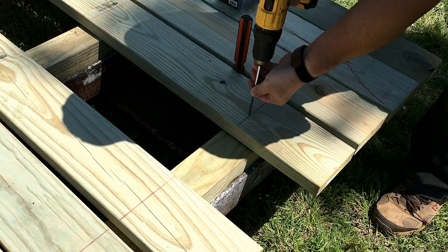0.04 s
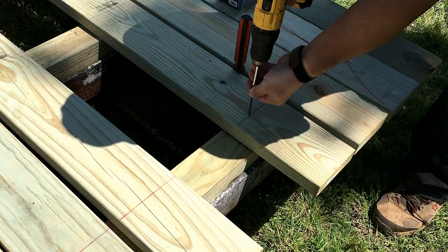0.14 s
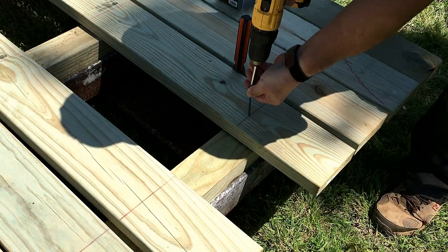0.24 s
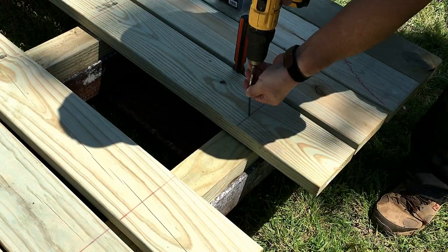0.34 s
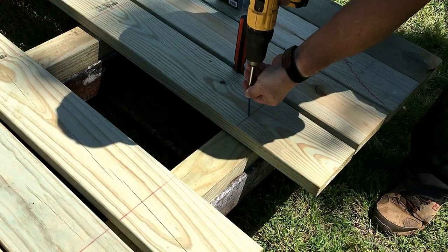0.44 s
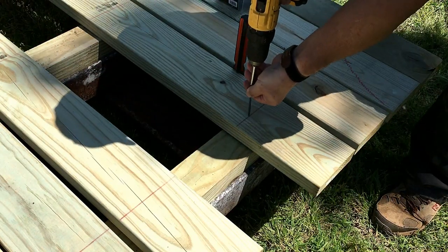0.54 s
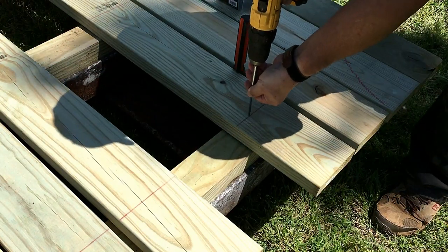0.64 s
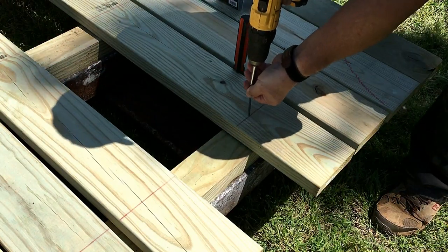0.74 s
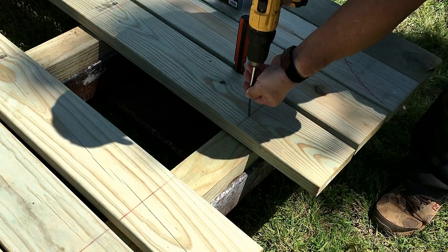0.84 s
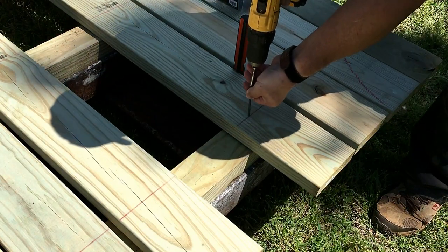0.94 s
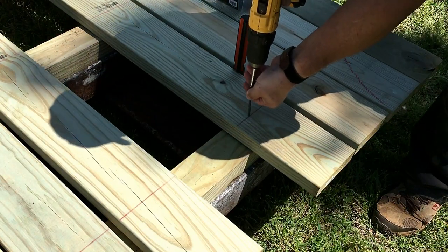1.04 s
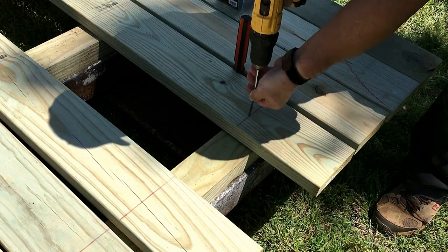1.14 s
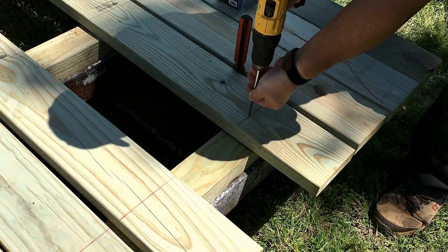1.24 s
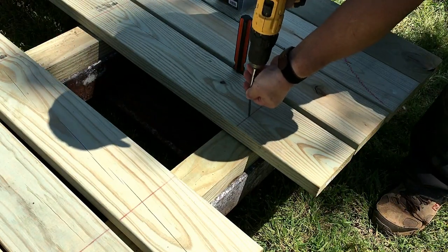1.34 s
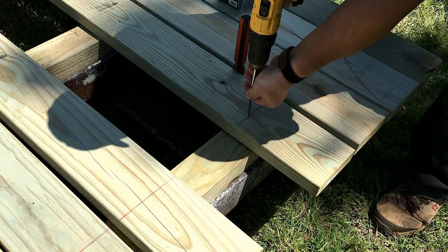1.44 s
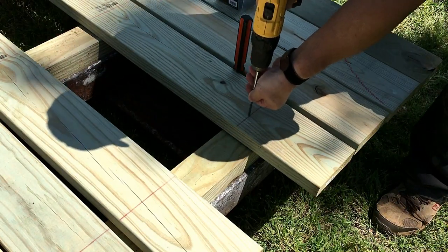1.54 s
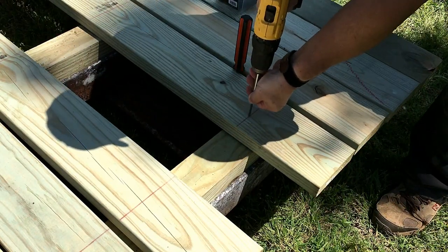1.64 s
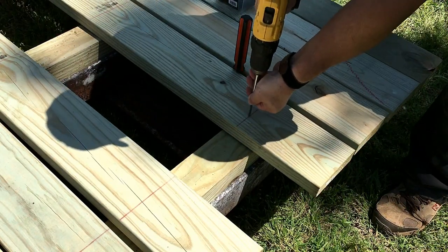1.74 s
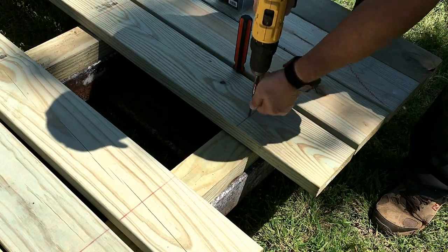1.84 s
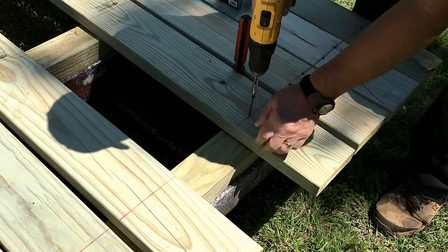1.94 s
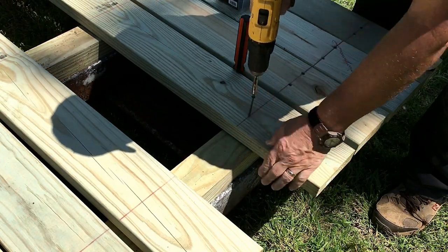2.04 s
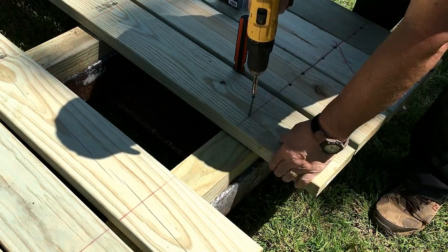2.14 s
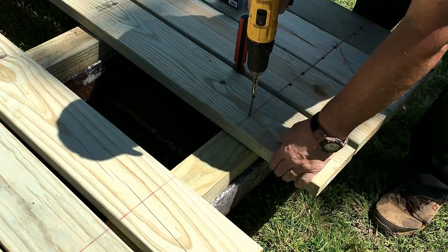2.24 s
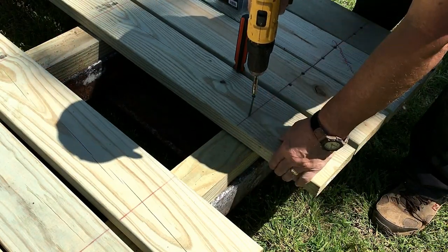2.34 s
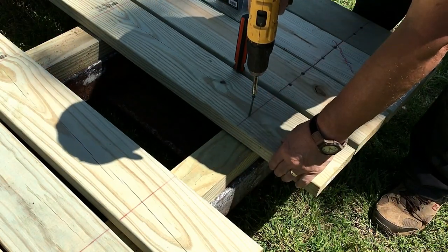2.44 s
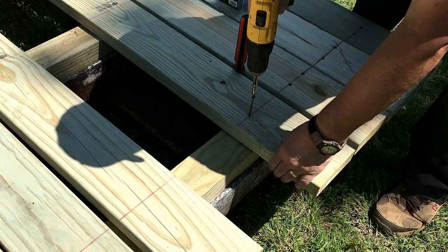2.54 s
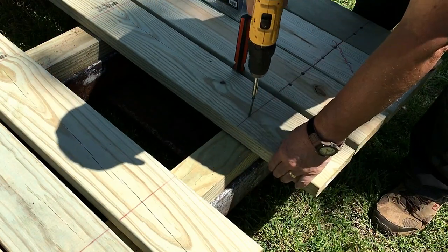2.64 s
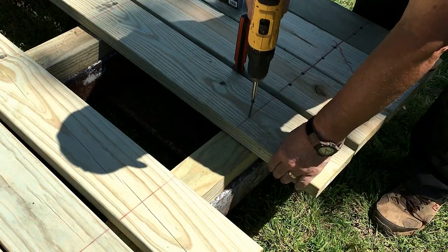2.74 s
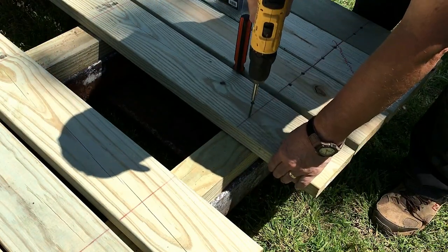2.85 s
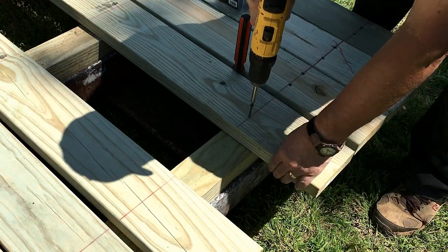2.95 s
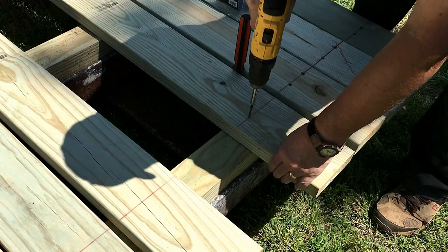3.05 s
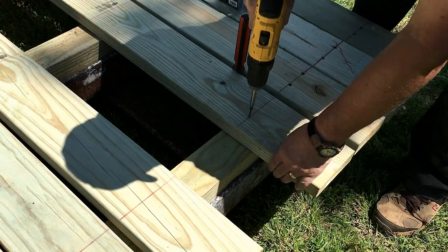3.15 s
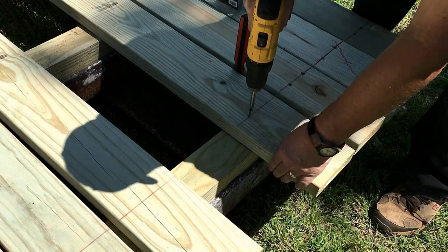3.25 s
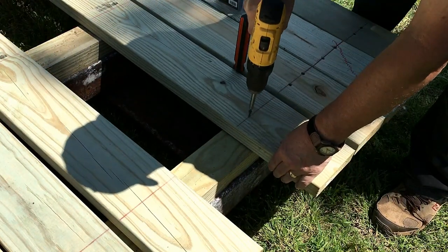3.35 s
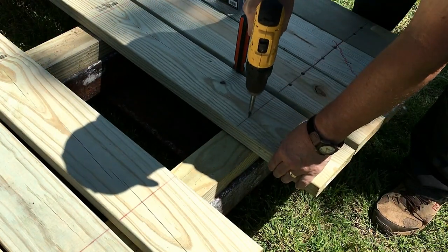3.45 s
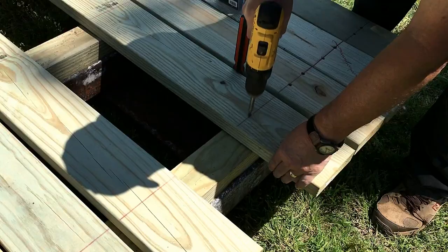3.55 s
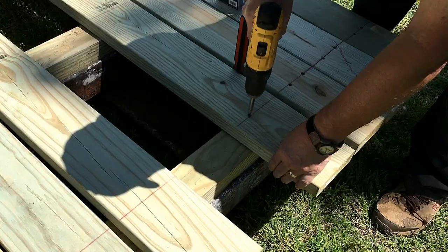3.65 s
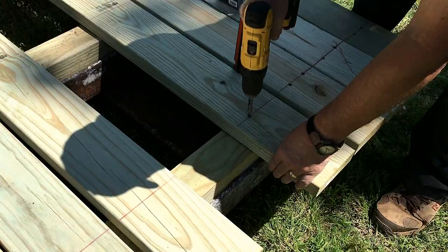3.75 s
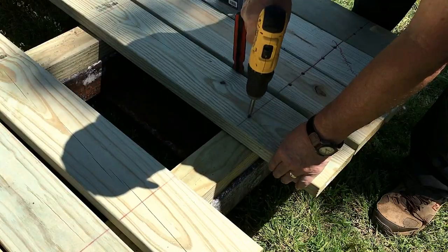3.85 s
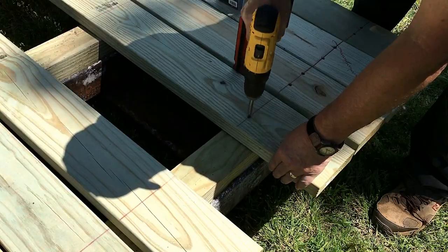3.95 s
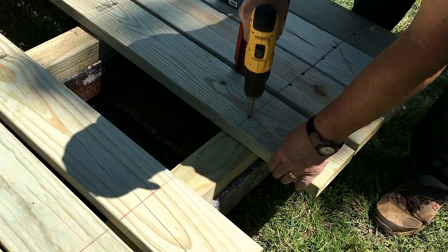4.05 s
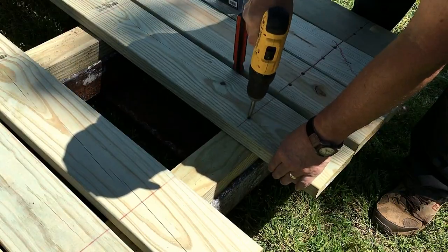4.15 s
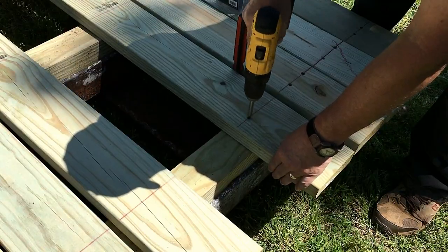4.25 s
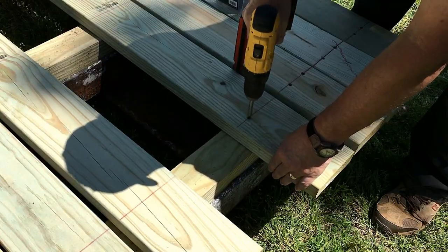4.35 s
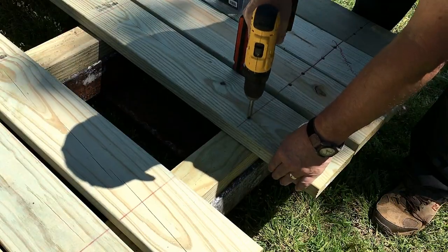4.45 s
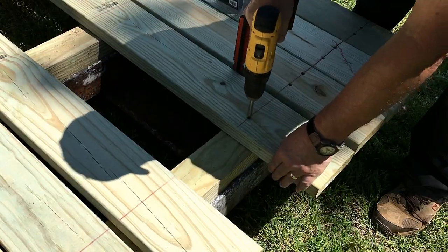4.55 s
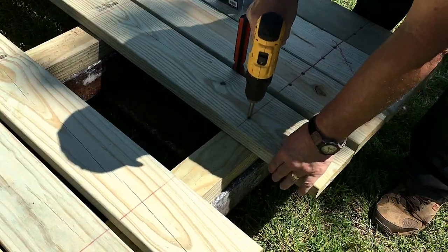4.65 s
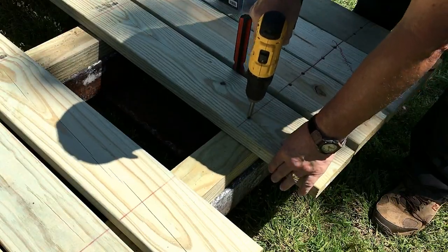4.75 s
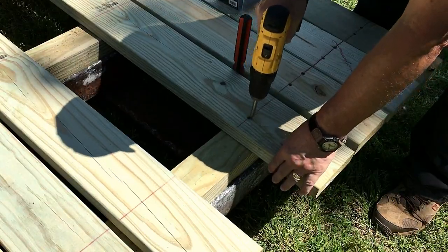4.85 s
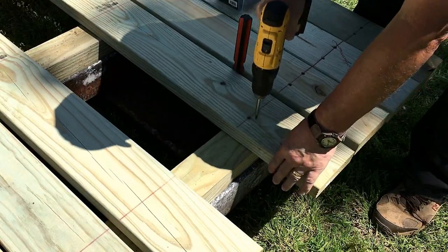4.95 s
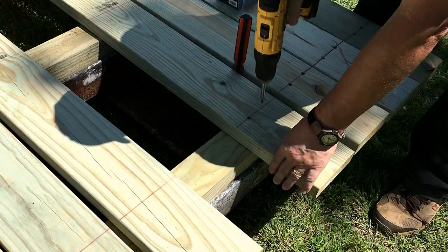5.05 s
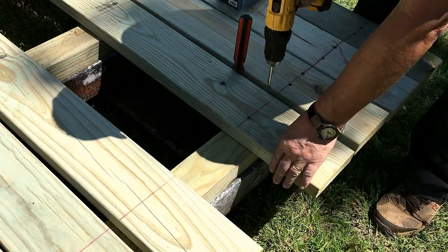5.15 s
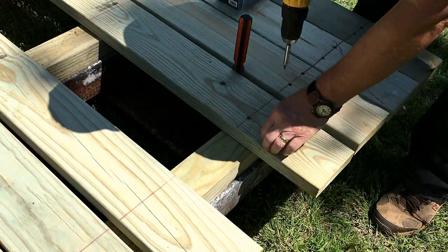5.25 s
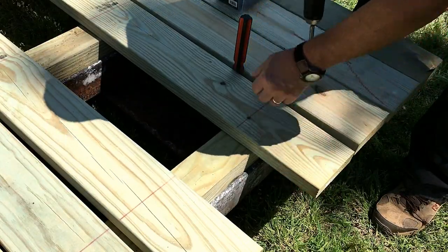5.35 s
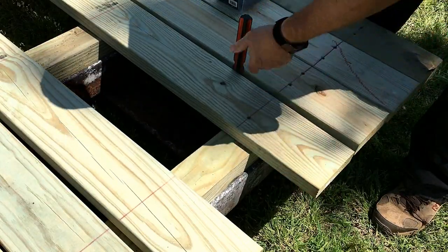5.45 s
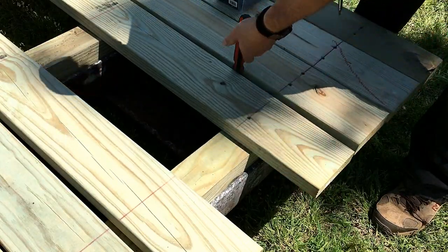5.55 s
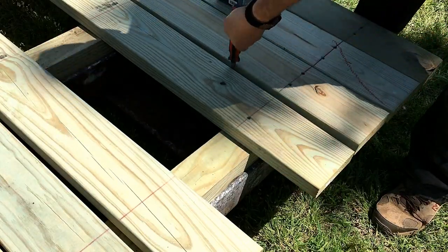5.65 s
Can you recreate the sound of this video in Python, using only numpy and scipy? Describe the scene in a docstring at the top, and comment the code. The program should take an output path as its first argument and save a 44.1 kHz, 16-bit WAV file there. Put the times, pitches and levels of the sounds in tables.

```python
"""A faint bird call over a low outdoor rumble, then a click: a cordless drill drives a long screw into a deck board.
We hear a slow run, a full-trigger run and two short bursts. One turning shaft drives the gears and the screw:
the gears whine and rattle, the bit grinds, and the screw shakes the board. The speed controller whistles
at part trigger. Between and after the runs the tool and a hand knock on the wood, with small dry clicks.
Small birds are gliding tones; the outdoor background is filtered noise."""
import sys
import numpy as np
from scipy import signal
from scipy.fft import rfft, irfft
from scipy.io import wavfile
from scipy.ndimage import uniform_filter1d

SR = 44100
rng = np.random.default_rng(int(sys.argv[2]) if len(sys.argv) > 2 else 0)


def transcribe(signal):
    """Save signal, clipped to [-1, 1], as a 16-bit WAV file at the path in sys.argv[1]."""
    frames = np.atleast_2d(signal).T
    limited = np.clip(frames, -1, 1)
    pcm = np.round(limited * 32767).astype(np.int16)
    wavfile.write(sys.argv[1], SR, pcm)


N = 251323
TIME = np.arange(N) / SR  # seconds
HZ = np.fft.rfftfreq(8192, 1 / SR)  # frequencies at which filters are drawn

# pulls of the trigger; levels are starting points that speed, strain and time then change:
# start_s, release_s, spin_up_s, gear_rattle_db, bit_grinding_db, tooth_whine_db
TRIGGER_PULLS = [(0.19, 1.890, .028, -40, -46, -39), (2.674, 3.650, 0.051, -34.5, -37.6, -34.6),
                 (3.815, 3.924, .028, -35.5, -31, -27.5), (4.099, 4.203, .032, -34.5, -30.2, -25)]
# how hard the drill works: time_s, load (bite of the thread, 0-1), strain (labouring motor, 0-1)
EFFORT_CURVE = [(1.52, 0, 0), (1.63, .2, 1), (1.95, .5, 1), (2.66, 1, .1), (3.55, 1, .1), (3.82, 1, 1)]
# how hard the thread shakes the board, before the effect of speed: time_s, level_db
THREAD_GRIP = [(.22, -54), (.47, -44), (.86, -40), (1.15, -38.5), (1.52, -40.5), (1.58, -35.5), (1.86, -33),
               (1.93, -44), (2.70, -39), (2.79, -28), (2.96, -30.3), (3.04, -27.5), (3.21, -30),
               (3.68, -32.3), (3.83, -35.5), (3.95, -31.5), (4.17, -29), (4.25, -31.5)]
# loudness grows as a power of speed, once the shaft passes a knee (turns per s)
RATTLE_POWER, RATTLE_KNEE = 0.97, 67
GRIND_POWER, GRIND_KNEE = 0.28, 53
BOARD_POWER, BOARD_KNEE = 0.31, 15
GRIND_DB_PER_S = 2.5  # the bit grinds harder as each run sinks the screw
RATTLE_STRAIN_DB = 2.4  # change at full strain


def drill(unsteady=0.00056, unsteady_loaded=0.00199):
    """One slightly unsteady shaft drives the gears and the screw; speed and effort set their levels."""
    effort_s, load_points, strain_points = np.transpose(EFFORT_CURVE)
    load = np.interp(TIME, effort_s, load_points)
    strain = np.interp(TIME, effort_s, strain_points)
    speed = motor_speed(load)
    # each moment takes its levels from the latest pull of the trigger
    pulls = np.array(TRIGGER_PULLS)
    latest = np.maximum(np.searchsorted(pulls[:, 0], TIME) - 1, 0)
    start, _, _, rattle_db, grind_db, whine_db = pulls[latest].T
    unsteadiness = (unsteady + unsteady_loaded * load) * drift(46.3)
    turns = np.cumsum(speed * (1 + unsteadiness)) / SR

    whine = tooth_whine(turns, speed, load, strain, whine_db)
    gears = gearbox(turns, speed, load, strain) * amp(rattle_db + RATTLE_STRAIN_DB * strain)
    gears = gears * with_speed(speed, RATTLE_POWER, RATTLE_KNEE)
    grind, board = screw(turns, load, strain)
    grind = grind * amp(grind_db + GRIND_DB_PER_S * (TIME - start))
    grind = grind * with_speed(speed, GRIND_POWER, GRIND_KNEE)
    board = board * amp(np.interp(TIME, *np.transpose(THREAD_GRIP)))
    board = board * with_speed(speed, BOARD_POWER, BOARD_KNEE)
    return whine + gears + grind + board


# the speed that trigger and wood allow the motor: time_s, speed_turns_per_s
ALLOWED_SPEED = [(.24, 146), (.35, 169.5), (.47, 188.8), (.55, 196.6), (.63, 201.7), (1.05, 215.7),
                 (1.2, 221.7), (1.4, 230.8), (1.48, 231.4), (1.55, 227.3), (1.62, 213.3), (1.8, 168.3),
                 (1.89, 152.5), (2.67, 330), (2.9, 329), (2.96, 316), (3.1, 300.8), (3.2, 296.6),
                 (3.29, 299.1), (3.43, 286), (3.5, 284.2), (3.65, 272.7), (3.82, 244), (4.1, 212)]
# turns per s, lost each second: the brake alone, and what a fully biting thread adds
BRAKE_SLOWING, THREAD_SLOWING = 1300, 2300
CRAWL_SPEED, USUAL_SPEED = 25, 200  # turns per s: silent at a crawl; the power of speed is 1 at usual


def motor_speed(load):
    """Each pull spins the shaft up toward the allowed speed; on release brake and thread slow it steadily."""
    allowed = np.interp(TIME, *np.transpose(ALLOWED_SPEED))
    speed = np.full(N, float(CRAWL_SPEED))
    for start, release, spin_up, *_ in TRIGGER_PULLS:
        driven = allowed * (1 - np.exp(-np.maximum(TIME - start, 0) / spin_up))
        slowing = BRAKE_SLOWING + THREAD_SLOWING * np.interp(release, TIME, load)
        pull_speed = driven - slowing * np.maximum(TIME - release, 0)
        speed = np.maximum(speed, pull_speed)
    return speed


def with_speed(speed, power, knee):
    """Gain of a part that wakes above a knee speed and grows with a power of the speed."""
    above_crawl = np.clip(speed / CRAWL_SPEED - 1, 0, 1)
    return above_crawl * (speed / USUAL_SPEED) ** power / (1 + (knee / speed) ** 4)


TEETH = 12  # tooth contacts per shaft turn
# how the housing passes the tooth whine: pitch_hz, gain_db
WHINE_HOUSING = [(1100, -34), (1550, -12), (1850, -11), (2050, -3.5), (2260, 0), (2420, -2), (2590, -19),
                 (2720, -2), (2780, -1), (2900, -8), (3150, -2), (3290, -15), (3530, -12), (3660, 6),
                 (3750, -6), (3860, -32)]
WHINE_DAMPING = 0.72  # share of those peaks and dips that full load damps
WHINE_STRAIN_DB, WHINE_WAVER_DB = -7.0, 1.6  # change at full strain; random waver at full load


def tooth_whine(turns, speed, load, strain, whine_db):
    """Gear teeth meet at an even rate and whine; the housing lifts some pitches and dulls others."""
    whine_db = whine_db + WHINE_STRAIN_DB * strain + WHINE_WAVER_DB * load * drift(25)
    whine_db = whine_db + (1 - WHINE_DAMPING * load) * read(WHINE_HOUSING, TEETH * speed)
    tone = np.sqrt(2) * np.cos(2 * np.pi * TEETH * turns)
    return tone * amp(whine_db) * with_speed(speed, 0, RATTLE_KNEE)


# motor tones before the housing colours them: multiple_of_shaft_speed, relative_level_db
MOTOR_TONES = [(20, 1), (30, 0), (33, 1), (35, -2), (36, -8), (37, -9), (38, -6), (39, -9), (40, -2),
               (41, -7), (42, -8), (43, -5), (44, -8), (45, 0), (47, -4), (48, -4), (49, -6), (50, -1),
               (53, -4), (55, -3), (60, -4), (63, -5)]
# side tones of the planet gear stages: multiple_of_shaft_speed, relative_level_db
PLANET_TONES = [(5.33, -6), (8.143, 0), (10.91, -2), (13.1, -4), (13.4, -3), (15, 0), (21.5, -3),
                (25.9, -4)]
# tone colour of the gear rattle running light; also colours the squeal: pitch_hz, relative_level_db
LIGHT_RATTLE = [(2200, -38), (3000, 1), (4200, 6.5), (4700, 2.5), (5700, 5.5), (6900, -2), (7900, 2.5),
                (9800, 1), (11200, -2.5), (14300, 0), (16000, -8.5)]
# tone colour of the gear rattle under load; also colours the loaded motor: pitch_hz, relative_level_db
LOADED_RATTLE = [(2200, -30), (3000, -2.5), (3600, 5), (4400, 3), (5000, -1.5), (6400, 0), (7300, -3),
                 (8900, 3), (10300, -10), (11500, -4.5), (12700, -6.5), (14200, -4.5), (16000, -11)]
# how the motor shell gives off its tones when running light: pitch_hz, gain_db
MOTOR_SHELL = [(2200, -30), (3200, -11), (4200, -5), (5000, -8), (5700, -6), (6200, 0), (6900, -11),
               (7700, -1), (9800, 0), (11200, -2), (13000, -3.5), (16000, -11)]
MOTOR_LIGHT_DB, MOTOR_LOADED_DB = -.7, -8.8  # gain on the coloured motor tones
SQUEAL_ORDER, SQUEAL_BLUR_HZ, SQUEAL_DB = 26.3, 420, -7  # squeal pitch as a multiple of shaft speed


def gearbox(turns, speed, load, strain, side_db=-11, side_strain_db=4, flutter_db=2.5):
    """Motor and gears ring in the housing; load trades clean tones for rattle, strain adds a rough squeal."""
    noise = chatter(turns)
    light = evened(colour(noise, amp(read(LIGHT_RATTLE, HZ))))
    loaded = evened(colour(noise, amp(read(LOADED_RATTLE, HZ))))
    rattle = (1 - load) * light + load * loaded

    shaken = turns + 0.0073 * strain * drift(140)  # the straining shaft turns unevenly
    tones = tone_stack(shaken, speed, MOTOR_TONES, flutter_db)
    motor_light = amp(MOTOR_LIGHT_DB) * colour(tones, amp(read(MOTOR_SHELL, HZ)))
    motor_loaded = amp(MOTOR_LOADED_DB) * colour(tones, amp(read(LOADED_RATTLE, HZ)))
    motor = (1 - load) * motor_light + load * motor_loaded

    side = tone_stack(turns, speed, PLANET_TONES, flutter_db) * amp(side_db + side_strain_db * strain)

    blur = drift(SQUEAL_BLUR_HZ) + 1j * drift(SQUEAL_BLUR_HZ)
    squeal = (blur * np.exp(2j * np.pi * SQUEAL_ORDER * turns)).real
    housing = amp(read(LIGHT_RATTLE, HZ)) / np.sqrt(1 + (HZ / 11500) ** 12)
    squeal = amp(SQUEAL_DB) * strain * colour(squeal, housing)
    return rattle + motor + side + squeal


def tone_stack(turns, speed, orders, flutter_db):
    """Fluttering tones locked to the shaft."""
    total = np.zeros(N)
    for multiple, db in orders:
        tone = np.cos(2 * np.pi * (multiple * turns + rng.random()))
        playable = multiple * speed < SR / 2  # mute tones too high for the sample rate
        total += amp(db + flutter_db * drift(19)) * tone * playable
    return evened(total)


PLANET, CARRIER = 8 / 21, 3 / 11  # turns per shaft turn


def chatter(turns, depth=0.44, loose_db=1.0):
    """Noise that swells at each tooth contact and each planet turn; loose teeth hit unevenly."""
    tooth_swell = 1 + depth * np.cos(2 * np.pi * TEETH * turns)
    planet_swell = 1 + 0.084 * np.cos(2 * np.pi * PLANET * turns)
    uneven = amp(loose_db * drift(660))
    return evened(rng.standard_normal(N) * tooth_swell * planet_swell * uneven)


# tone colour of the bit grinding in the screw head: pitch_hz, relative_level_db
GRIND_COLOUR = [(400, -29), (900, -0.5), (1200, 2), (1700, 3.5), (2000, 1.5), (2450, 6), (2800, -0.5),
                (3600, -5), (6000, -48)]
HUM_ORDER, HUM_SHARE = 7, 1.0  # harmonic of the planet turn; its share of the push


def screw(turns, load, strain, rough_light=0.64, rough_loaded=0.99, judder=0.7, carrier_share=0.46,
          slip_db=2.0, grains_per_turn=8):
    """Planet wobble and the slipping thread shake the board; under strain the screw judders deeply."""
    grind = evened(colour(chatter(turns), amp(read(GRIND_COLOUR, HZ))))

    wheels = wobble(PLANET * turns, count=16, knee=7.92)
    wheels += carrier_share * wobble(CARRIER * turns, count=14, knee=10.9)
    # wood fibres pass the thread
    friction = evened(np.interp(grains_per_turn * turns, np.arange(N), rng.standard_normal(N)))
    roughness = rough_light + load * (rough_loaded - rough_light)
    slip_colour = [(100, -20.0), (220, -7), (310, 4), (420, -11.5), (800, -31.5)]
    slips = evened(colour(rng.standard_normal(N), amp(read(slip_colour, HZ))))
    # one planet harmonic throbs above the rest, and fades with load and strain
    hum = np.cos(2 * np.pi * HUM_ORDER * PLANET * turns) * evened(amp(8.4 * drift(15)))
    hum_share = HUM_SHARE * (1 - 0.68 * load) * (1 - strain)
    push = wheels + hum_share * hum + roughness * friction + judder * strain * slips

    board = colour(push * amp(slip_db * drift(200)), board_gain())
    board /= np.sqrt(uniform_filter1d(board ** 2, size=4000) + 1e-6)  # hold an even level
    return grind, board


def wobble(turns, count, knee):
    """Flaws of a wheel repeat each turn: a stack of its harmonics, falling away above the knee."""
    total = np.zeros(N)
    for k, phase in enumerate(rng.random(count), 1):
        total += np.cos(2 * np.pi * (k * turns + phase)) / np.sqrt(1 + (k / knee) ** 10)
    return evened(total)


# trigger held part way, level of the main tone: start_s, end_s, level_db
PART_TRIGGER_SPANS = [(0.192, 1.229, -32.5), (1.225, 1.892, -31.5), (2.655, 2.7, -38)]
SWITCH_HZ = 3923


def controller(second_db=-30, third_db=-32, waver_db=0.37):
    """Chopped current makes the motor windings whistle at the switching rate."""
    out = np.zeros(N)
    for start, end, db in PART_TRIGGER_SPANS:
        t = np.arange(int((end - start) * SR)) / SR
        a = 2 * np.pi * SWITCH_HZ * t
        gate = (1 - np.exp(-t / 0.0059)) * np.minimum((t[-1] - t) / 0.0056, 1)
        whistle = np.sin(a) + amp(second_db) * np.sin(2 * a) + amp(third_db) * np.sin(3 * a)
        add(out, start, np.sqrt(2) * amp(db) * gate * whistle)
    return out * amp(waver_db * drift(40))


# knocks on the board, before the deck's echo:
# time_s, peak_db, centre_hz, spread_octaves, contact_s, low_thud_peak_db
BOARD_KNOCKS = [(2.226, -28, 1400, 0.97, .014, -43), (2.643, -35, 68, .47, .003, -60),
                (4.009, -29, 333, 0.28, 0.0087, -42), (4.278, -20, 1210, 0.57, 0.0061, -29),
                (4.978, -20, 640, .85, .012, -25.5)]
THUD_HZ, THUD_OCTAVES, THUD_S = 205, .5, .02  # the thud's centre, spread and contact time


def knocks():
    """Hard contacts reach the board's higher modes; under each the whole board thuds."""
    out = np.zeros(N)
    for s, db, hz, octaves, contact_s, thud_db in BOARD_KNOCKS:
        knock = amp(db) * blow(hz, octaves, contact_s)
        thud = amp(thud_db) * blow(THUD_HZ, THUD_OCTAVES, THUD_S)
        add(out, s, knock + thud)
    return out


def blow(hz, octaves, contact_s, scuff=0.42, skirt_db=-32):
    """A blow with a brief scuff rings the board's modes around one pitch; peak 1."""
    t = np.arange(SR // 3) / SR
    push = (t == 0) + scuff * rng.standard_normal(len(t)) * np.exp(-t / contact_s)
    reach = np.exp(-.5 * (np.log2((HZ + 1) / hz) / octaves) ** 2)
    reach = reach + amp(skirt_db) / (1 + (HZ / hz) ** 2)
    ring = colour(push, board_gain() * reach)
    return ring / abs(ring).max()


# pitches at which the deck board rings: pitch_hz, width_hz, relative_level_db
BOARD_MODES = [(151, 10.3, -9), (209, 16, -10), (252, 30, 0.6), (314, 36, -4.5), (433.3, 22.4, 1.5),
               (582.5, 40.5, 5.5), (606, 40, -15), (713.5, 47, 3.5), (733, 17, 1.5), (935, 20, -1),
               (999, 37, 2), (1119.9, 41, 3), (1350, 240, -6)]


def board_gain(between_db=-24):
    """The board's modes over a weak broad response."""
    power = amp(between_db) ** 2 / (1 + (HZ / 2500) ** 4) / (1 + (140 / (HZ + 1)) ** 4)
    for hz, width, db in BOARD_MODES:
        off_pitch = (HZ ** 2 - hz ** 2) / (width * (HZ + 1))
        power = power + amp(db) ** 2 / (1 + off_pitch ** 2)
    return np.sqrt(power)


# clicks of trigger, chuck and bit, before the deck's echo: time_s, peak_db, decay_s, dull_above_hz
TOOL_CLICKS = [(0.126, -44, 0.0016, 12000), (0.196, -30.5, 0.0034, 4030), (2.2277, -33.5, 0.0024, 4300),
               (3.771, -44, .001, 14000), (3.804, -32.5, .0014, 4500), (4.090, -42, 0.0011, 12000),
               (4.101, -38, 0.0013, 14000), (4.894, -36, 0.0019, 14000), (4.977, -25.5, 0.0018, 11100),
               (5.281, -47, 0.00075, 12000)]


def clicks(ring=0.079):
    """Small dry ticks of steel and plastic: noise bursts that die quickly, with a weak longer ring."""
    out, t = np.zeros(N), np.arange(SR // 20) / SR
    shape = amp(read([(300, -15), (1300, 2.0), (4000, 0), (6000, -6), (9000, -1.5), (16000, -6)], HZ))
    for s, db, decay, dull_hz in TOOL_CLICKS:
        burst = rng.standard_normal(len(t)) * (np.exp(-t / decay) + ring * np.exp(-t / 0.019))
        tick = colour(burst, shape / np.sqrt(1 + (HZ / dull_hz) ** 4))
        add(out, s, amp(db) * tick / abs(tick).max())
    return out


def yard(x, deck_db=-5, deck_s=0.054, yard_db=-28, yard_s=.09):
    """The hollow under the deck booms on; a faint echo returns from the yard."""
    t = np.arange(SR // 2) / SR
    hollow = [(80, -21.0), (170, -0.5), (300, -2.0), (500, -15.0), (1500, -19.0), (5000, -57)]
    boom = colour(rng.standard_normal(len(t)) * np.exp(-t / deck_s), amp(read(hollow, HZ)))
    boom = boom / np.sqrt(deck_s * SR / 2)
    far = rng.standard_normal(len(t)) * np.exp(-t / yard_s)
    tail = amp(deck_db) * boom + amp(yard_db) * far / np.linalg.norm(far)
    return x + signal.oaconvolve(x, tail)[:N]


# bird calls, before their echo; the pitch rises by the arch and returns:
# start_s, length_s, pitch_hz, arch_hz, peak_db
BIRD_CALLS = [(0.0, .04, 9450, 100, -65), (1.98, .11, 9450, 40, -62), (2.39, .09, 9400, 130, -63),
              (3.70, .06, 9450, 130, -61), (3.98, .06, 9250, 100, -65), (4.255, .08, 7150, 400, -59),
              (4.44, .09, 2380, 50, -68), (4.68, .12, 2320, 100, -67), (4.885, .097, 6700, 1000, -54),
              (5.135, .045, 4200, 200, -69), (5.41, .07, 9480, 130, -62)]


def birds(echo_db=-6.5, echo_s=0.03):
    """Thin arched whistles, blurred by echoes from the trees."""
    out = np.zeros(N)
    for s, length, hz, arch, db in BIRD_CALLS:
        bend = np.sin(np.pi * np.linspace(0, 1, int(length * SR)))
        whistle = np.sin(2 * np.pi * np.cumsum(hz + arch * bend) / SR)
        add(out, s, amp(db) * np.sqrt(bend.clip(0)) * whistle)
    t = np.arange(SR // 2) / SR
    tail = rng.standard_normal(len(t)) * np.exp(-t / echo_s)
    return out + amp(echo_db) * signal.oaconvolve(out, tail / np.linalg.norm(tail))[:N]


# tone colour of the outdoor background: pitch_hz, relative_level_db
AIR_COLOUR = [(12, -48), (20, -11.5), (64, -4.5), (238, -14), (266, -18.5), (439, -31.5), (631, -29),
              (1200, -24.5), (1770, -33.5), (2400, -38.5), (2760, -41), (7310, -50), (9660, -50.5),
              (10500, -54.5), (15500, -59)]
# level of the low rumble, before its random lumps: time_s, level_db
RUMBLE_LEVEL = [(0, -46.5), (.55, -48), (.7, -54), (1.17, -45.5), (1.45, -58), (1.7, -49), (1.9, -52.5),
                (3.2, -51), (3.7, -53.5), (4.2, -53), (4.5, -48), (5.1, -48.5), (5.7, -52)]
WASH_DB, WASH_SWELL_DB = -58, .6


def outdoors(lumps_db=1.1):
    """A lumpy low rumble under a nearly steady distant wash, both filtered noise."""
    shape = amp(read(AIR_COLOUR, HZ))
    low = 1 / (1 + (HZ / 260) ** 4)  # share of power given to the rumble
    rumble_gain = shape * np.sqrt(low / (1 + (36 / (HZ + 1)) ** 10))
    rumble = evened(colour(rng.standard_normal(N), rumble_gain))
    wash = evened(colour(rng.standard_normal(N), shape * np.sqrt(1 - low)))
    rumble_db = np.interp(TIME, *np.transpose(RUMBLE_LEVEL)) + lumps_db * drift(6.7)
    return rumble * amp(rumble_db) + wash * amp(WASH_DB + WASH_SWELL_DB * drift(2.6))


def amp(db):
    """Turn decibels into an amplitude factor."""
    return 10 ** (np.asarray(db) / 20)


def evened(x):
    """Scale to an rms (average strength) of 1."""
    return x / np.sqrt(np.mean(x ** 2) + 1e-20)


def read(points, hz):
    """Read a curve of (frequency, value) points, with frequency on a log scale."""
    f, value = np.transpose(points)
    return np.interp(np.log(hz + 1), np.log(f + 1), value)


def add(mix, s, sound):
    """Mix a sound in, starting at s seconds."""
    part = mix[max(round(s * SR), 0):][:len(sound)]
    part += sound[:len(part)]


def colour(x, gain):
    """Causal filter with the given gain at the frequencies HZ."""
    log_gain = np.log(np.maximum(gain, 1e-5))
    circle = np.concatenate([log_gain, log_gain[-2:0:-1]])
    # minimum phase: the filter responds as early as its gain allows
    taps = np.fft.ifft(np.exp(np.conj(signal.hilbert(circle)))).real
    return signal.oaconvolve(x, taps[:len(HZ)])[:len(x)]


def drift(rate_hz):
    """Smooth random wandering of rms 1, up to about the given rate."""
    f = np.fft.rfftfreq(N, 1 / SR)
    return evened(irfft(rfft(rng.standard_normal(N)) * np.exp(-(f / rate_hz) ** 2), N))


def scene():
    """Everything reaches one microphone, heard alike in both channels."""
    on_deck = yard(drill() + knocks() + clicks())
    mono = on_deck + controller() + birds() + outdoors()
    return np.array([mono, mono])


def record(dry):
    """A steep filter ends the treble near 15850 Hz."""
    low_pass = signal.firwin(511, 15850, window=("kaiser", 9), fs=SR)
    return signal.oaconvolve(dry, low_pass[None], "same")


dry = scene()
out = record(dry)
transcribe(out)
```